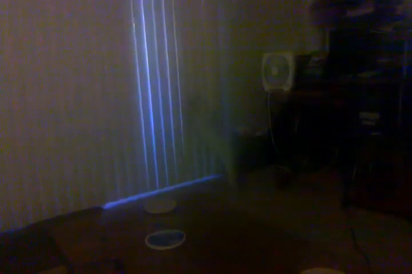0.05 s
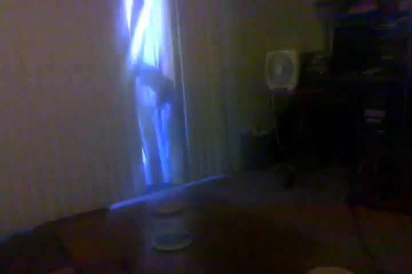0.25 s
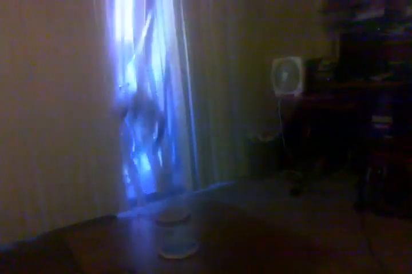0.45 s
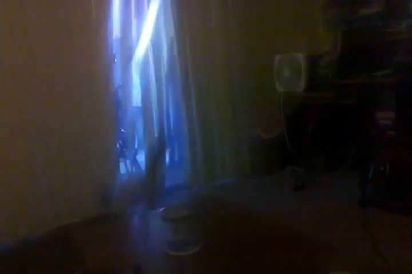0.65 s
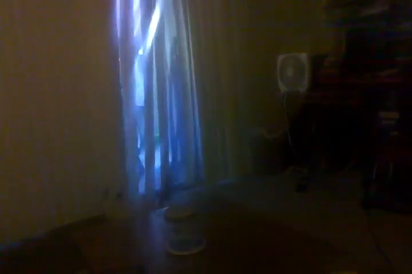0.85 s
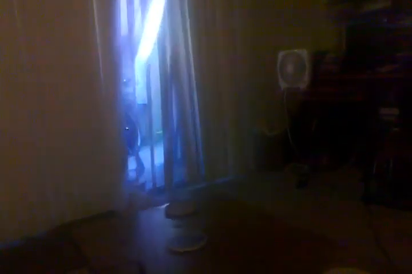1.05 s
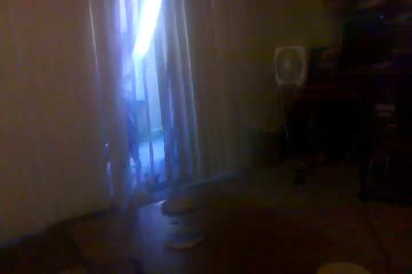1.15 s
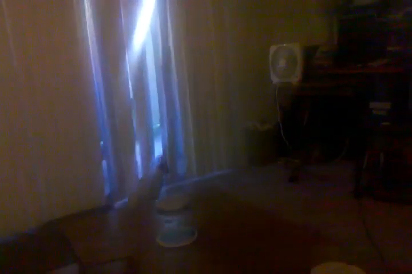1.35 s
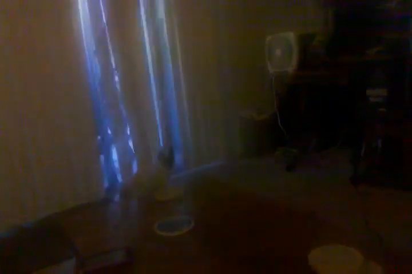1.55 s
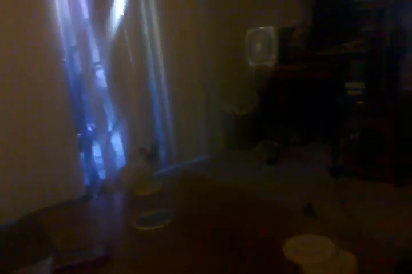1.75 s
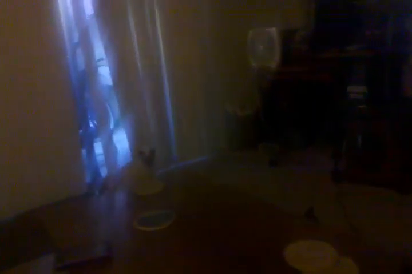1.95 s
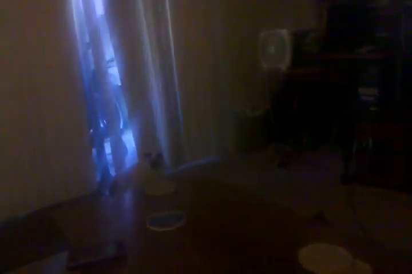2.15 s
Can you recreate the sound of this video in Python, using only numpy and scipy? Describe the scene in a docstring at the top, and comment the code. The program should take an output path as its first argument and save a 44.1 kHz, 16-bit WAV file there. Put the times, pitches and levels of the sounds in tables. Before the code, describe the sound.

Vertical blind slats clatter under a jumping cat, with a soft thud and a short whine.

```python
"""A cat leaps into the blinds

Across a small room, a cat jumps into vertical plastic blinds. The slats crash together, its body thuds
against the door behind, and a short whine sounds. The slats swing on and knock a few times.
Small dry ticks sound close to a hand-held microphone, whose two openings colour the stereo sound."""
import sys
import numpy as np
from scipy import signal
from scipy.fft import rfft, irfft
from scipy.io import wavfile
from scipy.ndimage import uniform_filter1d

SR = 44100
rng = np.random.default_rng(int(sys.argv[2]) if len(sys.argv) > 2 else 0)


def materialize(psi):
    """Save the field psi as 16-bit PCM at rate SR to the path in sys.argv[1].

    A 1-D psi becomes a single channel; in a 2-D psi each row is a channel.
    """
    bounded = np.clip(np.atleast_2d(psi).T, -1, 1)
    quanta = np.round(bounded * 32767).astype(np.int16)
    wavfile.write(sys.argv[1], SR, quanta)


N = 97020  # 2.2 seconds
RING_ATTACK_S = 0.00066


def undb(db):
    """Turn decibels into a gain."""
    return 10 ** (np.asarray(db) / 20)


def over_hz(table, hz):
    """Read a table of (Hz, value) rows at any frequency, with octaves evenly spaced."""
    points, values = np.array(table, float).T
    return np.interp(np.log(np.maximum(hz, 1)), np.log(points), values)


def over_time(table):
    """Join rows that begin with a time in seconds into one curve for each other column."""
    times, *columns = np.array(table, float).T
    return [np.interp(np.arange(N) / SR, times, column) for column in columns]


def colour(x, table, tilt_db=0):
    """Shape the tone, keeping white noise equally strong; tilt_db is added per octave above 1 kHz."""
    hz = np.arange(N + 1) * SR / (2 * N)
    gain = undb(over_hz(table, hz) + tilt_db * np.log2(np.maximum(hz, 1000) / 1000))
    cepstrum = irfft(np.log(gain / np.sqrt(np.mean(gain ** 2))))
    cepstrum[1:N] *= 2  # folded so that the filter never sounds ahead of a hit
    cepstrum[N + 1:] = 0
    return irfft(rfft(x, 2 * N) * np.exp(rfft(cepstrum)))[..., :N]


def fade(start, decay):
    """Jump to 1 at the start, then die away; both times are in seconds."""
    age = np.arange(N) / SR - start
    return (age >= 0) * np.exp(-np.maximum(age, 0) / decay)


def pan(left_db):
    """Two gains that make the left channel louder than the right by left_db."""
    return undb(np.array([[left_db], [-left_db]]) / 2)


def ring_of(modes, start, pitch):
    """A struck object rings with several fading tones, each with its own phase in each channel."""
    t = np.arange(SR // 2) / SR
    ring = 0
    for hz, db, t60 in modes:
        cycles = hz * pitch * t + rng.random((2, 1))
        ring = ring + undb(db) * np.exp(-np.log(1000) * t / t60) * np.sin(2 * np.pi * cycles)
    strength = np.sqrt(sum(undb(db) ** 2 for _, db, _ in modes) / 2)
    ring = ring * (1 - np.exp(-t / RING_ATTACK_S)) / strength
    return np.pad(ring, ((0, 0), (int(start * SR), N)))[:, :N]


def air():
    """Still air makes a faint, steady rush."""
    # Each row: frequency in Hz, relative level in dB.
    spectrum = [(30, -13), (110, -0.5), (240, 1.5), (871, -6), (1880, -35), (4070, -18), (14000, -6)]
    return undb(-62) * colour(rng.standard_normal((2, N)), spectrum)


def room(x):
    """Echoes from the walls blur into a short tail whose treble dies first."""
    # Each row: frequency in Hz, seconds to fade by 60 dB.
    fade_times = [(150, 0.59), (500, 0.51), (1400, 0.36), (4000, 0.44), (12000, 0.33)]
    build_s = 0.0017
    t, hz = np.arange(SR) / SR, np.arange(SR // 2 + 1)
    noise, tail = rfft(rng.standard_normal((2, SR))), 0
    for low in 22 * 2 ** np.arange(10):  # octave bands
        band = irfft(noise * ((hz >= low) & (hz < 2 * low)))
        tail = tail + band * np.exp(-np.log(1000) * t / over_hz(fade_times, low * np.sqrt(2)))
    tail *= 1 - np.exp(-t / build_s)
    tail /= np.linalg.norm(tail, axis=1, keepdims=True)
    return signal.fftconvolve(x, tail, axes=-1)[:, :N]


def hum():
    """A faint, low tone briefly swells and fades."""
    peak_s, width_s, hz, db = 1.49, 0.052, 122, -61.5
    t = np.arange(N) / SR
    swell = np.exp(-((t - peak_s) / width_s) ** 2)
    return undb(db) * swell * np.sin(2 * np.pi * hz * t)


def ticks():
    """Dry, bright ticks beside the microphone: each is a burst of noise with a very short ring."""
    # Each row: start in seconds, level in dB, decay in seconds, treble tilt in dB per octave,
    # pitch multiplier of the ring, ring level in dB relative to the tick.
    hits = [(.118, -36, 0.001, -4.5, 0.41, -2), (0.1336, -39.5, 0.0017, 6, 0.81, -24),
            (1.211, -41, 0.0052, 13, 1, -24), (1.279, -33.5, 0.0049, 3, 1, -16),
            (1.322, -29.5, 0.0033, 0, 0.81, -22), (1.33, -35, 0.0055, 7, 1, -11),
            (1.336, -23, 0.00079, -0.5, 1, 4), (1.338, -28.5, 0.0031, 5, 0.87, -8),
            (1.351, -37.5, 0.0086, 0, 0.88, -11)]
    # Each row of both tables: frequency in Hz, relative level in dB.
    spectrum = [(300, -23), (1800, -11), (3500, -14), (4400, -4), (5200, 2.5), (5900, -3), (7700, 4.5),
                (9200, -3.5), (10700, 1), (14000, -17)]
    modes = [(4550, -2), (5100, -3.5), (7700, -2)]
    t, out = np.arange(N) / SR, 0
    for start, db, decay, tilt, pitch, ring_db in hits:
        force = undb(db) * fade(start, decay)
        burst = colour(force * rng.standard_normal((2, N)), spectrum, tilt)
        ring = sum(undb(ring_db + mode_db) * np.sin(2 * np.pi * hz * pitch * (t - start))
                   for hz, mode_db in modes)
        below_ring_cut = signal.butter(10, 4240 * pitch, "high", fs=SR, output="sos")
        out = out + burst + signal.sosfilt(below_ring_cut, force * ring)
    return out


def whine():
    """A nearly pure tone and its softer octave rise and fall, off to the left."""
    # Each row: time in seconds, pitch in Hz, level in dB.
    melody = [(.555, 460, -56), (.574, 483.7, -38.5), (.598, 479.4, -44), (.62, 528, -45.5),
              (.648, 532.7, -40.5), (.675, 511.6, -52), (.70, 476, -34.5), (.722, 444, -54)]
    pitch_jitter, octave_db = 0.024, -11.5
    t = np.arange(N) / SR
    hz, db = over_time(melody)
    waver = uniform_filter1d(rng.standard_normal(N), size=200)
    phase = 2 * np.pi * np.cumsum(hz * (1 + pitch_jitter * waver / waver.std())) / SR
    tone = np.sqrt(2) * (np.sin(phase) + undb(octave_db) * np.sin(2 * phase))
    sounding = (t > melody[0][0]) & (t < melody[-1][0])
    return undb(db) * sounding * tone * pan(left_db=12)


def thuds():
    """The cat's soft, heavy body meets door and floor, booming and leaving the door panel ringing."""
    # Each row: start in seconds, level in dB, decay in seconds, ring level in dB, pitch multiplier.
    blows = [(0.0, -39, .011, -63, 1), (.188, -33.5, 0.02, -57, 0.74), (.235, -42, 0.015, -43, 1),
             (.279, -23, 0.021, -28, 0.99), (.689, -39.5, 0.018, -39.5, .68), (.875, -45.5, .012, -61, .68)]
    # Each row: frequency in Hz, relative level in dB.
    spectrum = [(30, -42), (80, -20), (125, -11.5), (200, -5), (295, -1), (400, -3), (700, -9.5),
                (2000, -40), (8000, -66)]
    # Each row: frequency in Hz, relative level in dB, seconds to fade by 60 dB.
    door_modes = [(159, -6, 0.11), (234, -7.5, 0.17), (284.7, 0, .24), (302.6, -2.5, 0.26), (353, -8, 0.22),
                  (698, -8, 0.19)]
    attack_s = 0.0031
    force, panel = 0, 0
    for start, db, decay, ring_db, pitch in blows:
        force = force + undb(db) * (fade(start, decay) - fade(start, attack_s))
        panel = panel + undb(ring_db) * ring_of(door_modes, start, pitch)
    boom = colour(force * rng.standard_normal((2, N)), spectrum)
    return (boom + panel) * pan(left_db=1)


def slat_taps():
    """Light taps make a slat ring with a single tone: a high ping or a hollow tock."""
    # Each row: start in seconds, pitch in Hz, level in dB, decay in seconds.
    taps = [(1.228, 2220, -39, 0.0047), (1.713, 4830, -46, 0.0055), (1.759, 4060, -31, 0.0025),
            (1.784, 1265, -33, 0.006), (1.797, 1260, -41, 0.01), (2.019, 4040, -46.5, 0.0045)]
    t, out = np.arange(N) / SR, 0
    for start, hz, db, decay in taps:
        envelope = fade(start, decay) - fade(start, RING_ATTACK_S)
        out = out + undb(db) * envelope * np.sin(2 * np.pi * hz * (t - start))
    return out


def slat_snaps():
    """Slat edges flick past each other with a crisp, very high crack."""
    # Each row: start in seconds, level in dB, decay in seconds.
    flicks = [(0.203, -23, 0.0015), (.265, -33, .003), (.505, -37, 0.0024), (0.8722, -28.5, .003),
              (.877, -28, 0.0061), (1.108, -40, 0.0049)]
    # Each row: frequency in Hz, relative level in dB.
    spectrum = [(2000, -28), (6000, -12), (10000, 2), (14000, -3.5)]
    force = sum(undb(db) * fade(start, decay) for start, db, decay in flicks)
    return colour(force * rng.standard_normal((2, N)), spectrum)


def contacts(per_second, spread_db, decay_s=0.0015):
    """Slats touch at random in tiny hits of uneven size, each a brief burst of noise."""
    hits = rng.random(N) < per_second / SR
    sizes = undb(spread_db * np.clip(rng.standard_normal(N), -2, 2))
    power = signal.lfilter([1], [1, -np.exp(-2 / (decay_s * SR))], hits * sizes ** 2)
    return np.sqrt(power / power.mean()) * rng.standard_normal((2, N))


def slat_crash():
    """Each slap rings a slat and sets off a dying flurry of contacts; the slats jostle in between."""
    # Each row: start in seconds, levels in dB of the dull clatter, the bright crack and the ring,
    # decay of the flurry in seconds, pitch multiplier of the slat.
    slaps = [(0.0, -45, -46, -49.5, 0.0094, 1), (0.174, -40, -38, -60, 0.017, 1),
             (0.203, -30.5, -30, -31.5, 0.024, .72), (0.266, -28.5, -35, -32, 0.0088, .9),
             (0.323, -29, -29, -27.5, 0.016, 1.05), (0.339, -25.5, -29.5, -26.5, 0.0061, 1.08),
             (.403, -29, -32, -31.5, 0.0058, .71), (0.411, -22, -27.5, -27, 0.0092, .92),
             (.428, -25, -30, -30.5, 0.014, 1.36), (0.488, -30, -44, -33.5, 0.0072, 1),
             (0.555, -33.5, -36.5, -33.5, 0.027, .95), (.618, -44, -53, -38, 0.0066, .92),
             (0.632, -37, -37.5, -41, 0.019, 1.1), (0.66, -36.5, -37, -34, 0.022, 1.04),
             (.683, -34, -48, -32, 0.016, 1.02), (.87, -36, -29.5, -38.5, 0.016, 1.05),
             (.949, -37.5, -39.5, -39, 0.018, 1.2), (1.022, -45.5, -42.5, -46.5, 0.0051, 1.18),
             (1.058, -49, -49, -47.5, 0.0065, 1.05), (1.106, -65, -50.5, -52, 0.011, 1),
             (1.224, -48.5, -39, -43, 0.034, 1.8), (1.351, -62, -43.5, -72, 0.016, 1),
             (1.416, -52.5, -46.5, -59, 0.023, 1), (1.498, -42.5, -34.5, -41, 0.011, 1),
             (1.519, -42.5, -33, -35.5, 0.014, 1.18), (1.555, -47, -39.5, -41.5, 0.028, 1.19),
             (1.759, -42, -37.5, -38, 0.012, 1), (1.785, -47, -55, -47, 0.003, 1),
             (2.017, -51.5, -50, -56, 0.0085, 1.38)]
    # Each row: frequency in Hz, relative level in dB, seconds to fade by 60 dB.
    slat_modes = [(524, -5.5, 0.061), (793.7, -6, 0.062), (1058, -6.5, 0.076), (1248, -2, .095),
                  (1293, -4.5, 0.08), (1444, -9.5, 0.023), (1721, -10.5, 0.057), (3720, -10, 0.027)]
    # Each row: time in seconds, clatter level in dB, crack level in dB.
    jostle_levels = [(0, -65, -55), (.165, -65, -67), (.2, -40, -42.5), (.3, -35, -35), (.35, -30.5, -32),
                     (.44, -33.5, -38), (.51, -42.5, -40.5), (.6, -49.5, -47.5), (.69, -44.5, -40.5),
                     (.77, -46, -48), (.86, -48, -41), (.98, -52.5, -53), (1.18, -56.5, -55.5),
                     (1.3, -59, -56.5), (1.46, -62.5, -57.5), (1.58, -59.5, -72), (1.67, -62, -58.5),
                     (1.88, -61, -59.5), (2.2, -60.5, -64)]
    # Each row of both tables: frequency in Hz, relative level in dB.
    clatter_spectrum = [(35, -65), (80, -35), (130, -15), (200, -5.5), (400, 2.5), (800, 1.5), (1400, 1),
                        (2000, -2), (2600, -3.5), (3500, -5), (6000, -35.5), (14000, -74)]
    crack_spectrum = [(500, -42.5), (2000, -1.5), (3200, 2), (4200, 1), (5500, -0.5), (7500, 4.5),
                      (10500, 0), (12000, 0), (14000, -7)]
    flurry = contacts(per_second=2000, spread_db=2)
    jostle = contacts(per_second=700, spread_db=3)
    clatter, crack = (jostle * undb(db) for db in over_time(jostle_levels))
    ring = 0
    for start, clatter_db, crack_db, ring_db, decay, pitch in slaps:
        burst = flurry * fade(start, decay)
        clatter += undb(clatter_db) * burst
        crack += undb(crack_db) * burst
        ring = ring + undb(ring_db) * ring_of(slat_modes, start, pitch)
    return colour(clatter, clatter_spectrum) + colour(crack, crack_spectrum) + ring


def scene():
    """Blinds, thuds and whine echo across the room; the hum, ticks and air have no echo."""
    crash = slat_crash() + slat_snaps() + thuds()
    taps, cry, background = slat_taps(), whine(), air()
    echo = room(undb(-1) * crash + undb(-5) * taps + undb(-9.5) * cry)
    return crash + taps + cry + echo + hum() + ticks() + background


def record(dry):
    """The microphone's two openings agree in the bass, then go in and out of step as the pitch rises."""
    # Each row: frequency in Hz, depth of this effect from 0 to 1.
    comb_depth = [(100, 0.22), (500, 0.58), (1000, 0.78), (1400, 1), (3100, 1), (4300, 0.93), (5500, 0.45),
                  (9000, 0.43), (12000, 0.67)]
    comb_spacing_hz, low_cut_hz, high_cut_hz = 2935, 77, 13950
    left, right = signal.sosfilt(signal.butter(2, low_cut_hz, "high", fs=SR, output="sos"), dry)
    hz = np.arange(N + 1) * SR / (2 * N)
    likeness = -over_hz(comb_depth, hz) * np.cos(2 * np.pi * np.maximum(hz / comb_spacing_hz, .5))
    mid = irfft(rfft(left + right, 2 * N) * np.sqrt(1 + likeness))[:N] / 2
    side = irfft(rfft(left - right, 2 * N) * np.sqrt(1 - likeness))[:N] / 2
    high_cut = signal.ellip(10, .2, 80, high_cut_hz, fs=SR, output="sos")
    return signal.sosfilt(high_cut, [mid + side, mid - side])


dry = scene()
out = record(dry)
materialize(out)
```